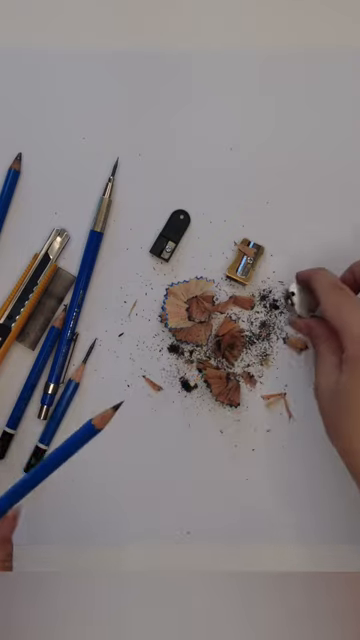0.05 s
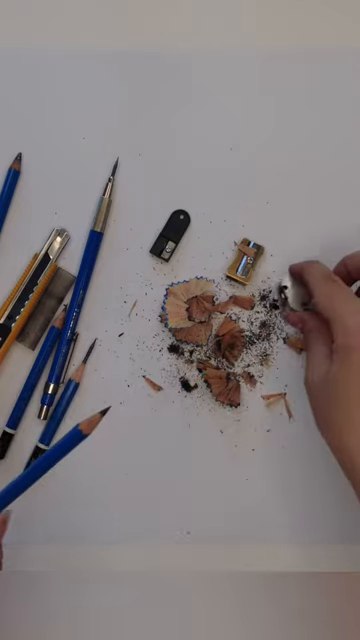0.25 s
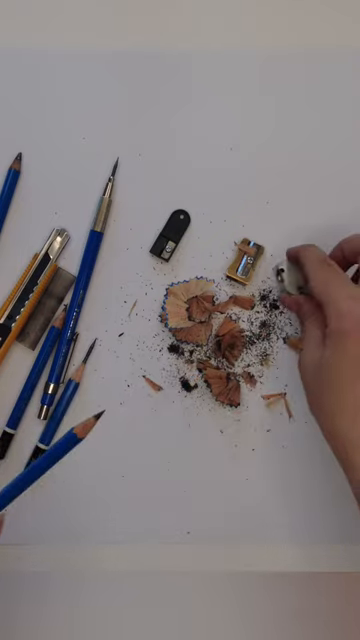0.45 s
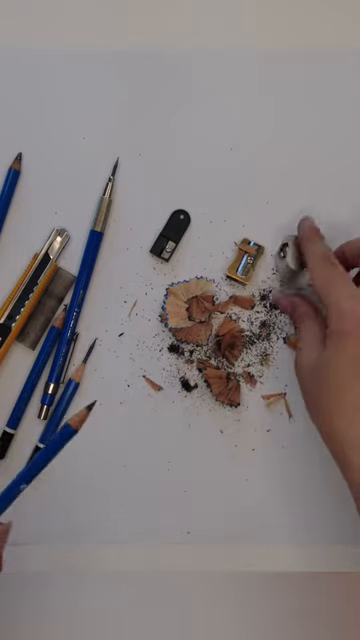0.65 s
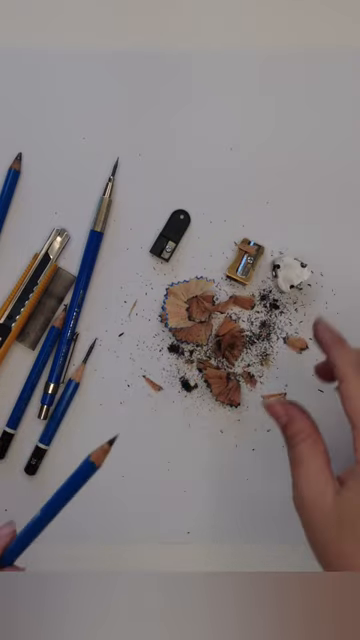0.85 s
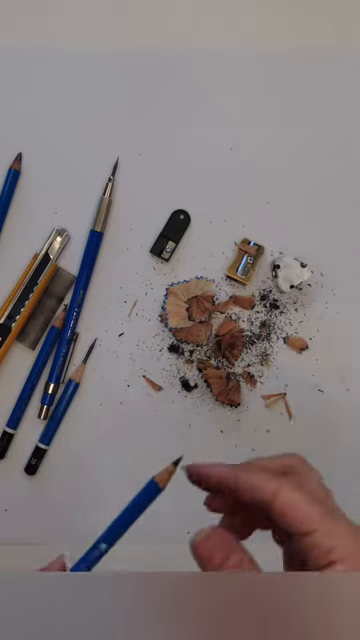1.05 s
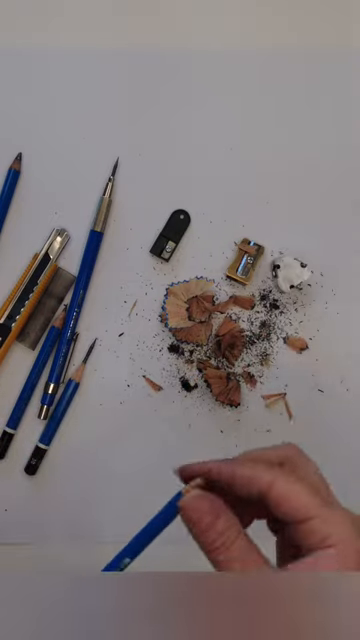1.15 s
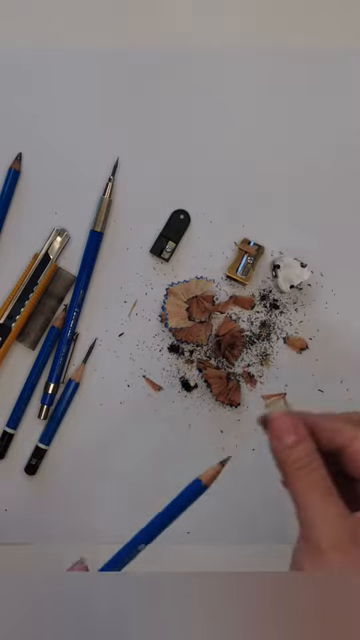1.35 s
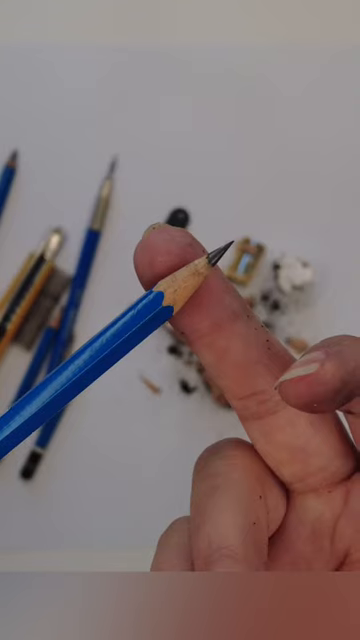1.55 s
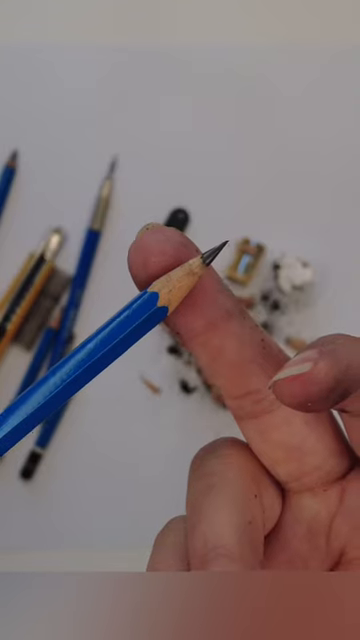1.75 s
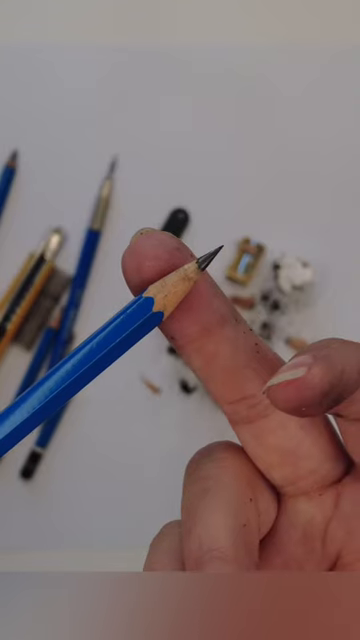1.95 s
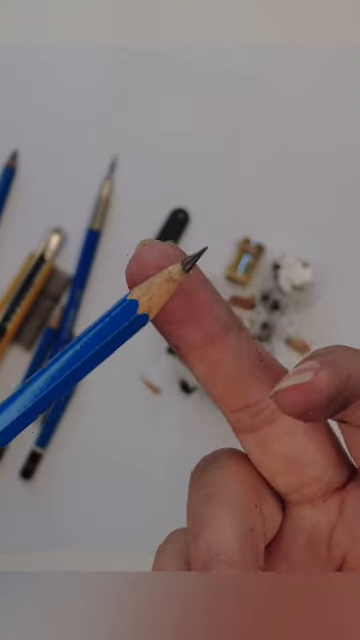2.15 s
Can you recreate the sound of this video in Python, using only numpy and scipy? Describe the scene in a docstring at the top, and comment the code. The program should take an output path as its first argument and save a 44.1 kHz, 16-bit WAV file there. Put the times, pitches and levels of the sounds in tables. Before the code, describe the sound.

An eraser is dabbed on paper four times between about 0.25 and 0.75 seconds, the third loudest, each a dull table thud with tiny clicks of paper and crumbs. It rocks lightly to rest. From about 1 second a hand slides faintly over the sheet and along a pencil, bumping the table softly at 1.5 seconds. Then only the small room's quiet hiss and rumble remain, slightly stronger.

```python
"""A small quiet room with paper on a table. A lump of eraser is dabbed four times on the sheet and
rocks to rest: each dab rings the table top with a dull thud while paper and crumbs click under it.
A hand then slides over the sheet and along a pencil, and bumps the table softly.
The sound breaks off for an instant and the room hiss returns a little stronger."""
import sys
import numpy as np
from scipy import signal
from scipy.fft import rfft, irfft, next_fast_len
from scipy.io import wavfile
from scipy.ndimage import map_coordinates

SR = 44100
rng = np.random.default_rng(int(sys.argv[2]) if len(sys.argv) > 2 else 0)


def unload_wav(signal):
    """Save mono or channel-first audio to the path in sys.argv[1] as 16-bit WAV at rate SR, clipped to [-1, 1]."""
    wavfile.write(
        sys.argv[1],
        SR,
        np.round(np.clip(np.atleast_2d(signal).T, -1, 1) * 32767).astype(np.int16),
    )


N = 97020
BREAK_S = 1.531

# Four eraser dabs, then a light contact as it rocks to rest:
# (time [s], push on the table [dB] in seven bands: thud, boom, body, hollow, knock, clack, rap)
DABS = [(0.2488, -2.5, 0, -4, 0.5, -5.5, -5.5, -2.5), (0.4382, -3, -2.5, 1.5, -3.5, -0.5, 1.5, -0.5),
        (0.556, 0, -0.5, 9.5, 4.5, 8, 8, 11.5), (0.7488, 0.5, -11, -2.5, -2.5, -6, -6, -8),
        (0.7891, -11, -22, -7.5, -4.5, -19.5, -10.5, -15)]
# Stereo image of room tone and handling: (frequency [Hz], left-right likeness [0-1])
IMAGE = [(40, 0.98), (200, 0.94), (500, 0.16), (1200, 0.12), (5000, 0.32), (12000, 0.059)]
# Stereo image of the reverb: (frequency [Hz], left-right likeness [0-1])
REVERB_IMAGE = [(100, 0.74), (300, 0.85), (600, 0.2), (1200, 0.24), (5000, 0.086), (14000, 0.18)]


def amp(db):
    """Decibels to gain."""
    return 10 ** (np.asarray(db) / 20)


def unit(x):
    """Scale to rms 1."""
    return x / np.sqrt(np.mean(x ** 2) + 1e-20)


def along(points, hz):
    """Read (frequency, value) points on a log axis."""
    freqs, values = np.transpose(points)
    return np.interp(np.log(hz + 1), np.log(freqs + 1), values)


def since(s):
    """Seconds since s, zero before."""
    return np.maximum(np.arange(N) / SR - s, 0)


def decay(t, t60, db=0):
    """An envelope that starts at db and falls 60 dB in t60 seconds."""
    return amp(db - 60 * t / t60)


def attack(t, rise_s):
    """A fade-in with time constant rise_s."""
    return 1 - np.exp(-t / rise_s)


def curves(rows):
    """One automation curve for each column after the time."""
    times, *columns = np.transpose(rows)
    return [np.interp(since(0), times, column) for column in columns]


def wobble(per_s):
    """A smooth random curve with per_s knots a second."""
    return map_coordinates(rng.standard_normal(4000), [since(0) * per_s], mode="mirror")


def filtered(x, response):
    """Shape x with a frequency response."""
    size = next_fast_len(N + SR // 2)
    return irfft(rfft(x, size) * response(np.fft.rfftfreq(size, 1 / SR)), size)[..., :N]


def noise(colour, image=IMAGE):
    """Stereo noise of rms 1; colour sets only the balance of its frequencies."""
    def response(hz):
        width = np.arccos(np.clip(along(image, hz), -1, 1)) / 2
        return amp(along(colour, hz)) * [np.cos(width), np.sin(width)]
    mid, side = filtered(rng.standard_normal((2, N)), response)
    return unit(np.array([mid + side, mid - side]))


def room_tone():
    """Low rumble, mains hum and quiet hiss; a broader hiss comes up early on, around 0.25 s."""
    # Noise colours: (frequency [Hz], level [dB])
    rumble = [(20, -7.5), (42, 4.5), (58, -4.5), (80, -7.5), (105, -11.5), (150, -21.5), (250, -23),
              (450, -43), (1000, -64.5)]
    quiet_hiss = [(100, 10), (400, 3), (700, 2.5), (1000, -3), (1400, 2), (2500, -9.5), (3900, -9),
                  (4900, -5), (8000, -11), (12500, -15.5), (13300, -40)]
    broad_hiss = [(100, 2.5), (400, 9.5), (700, 5), (1400, 3.5), (2500, -1), (3900, -4), (4900, -10),
                  (8000, -16), (12500, -21), (13300, -28)]
    # Fade-in of the broad hiss: (time [s], level [dB])
    broad_fade = [(0, -105), (.22, -100), (.3, -74.5), (.9, -74.5), (1.5, -75)]
    hum_hz = 100
    hum = amp(-61.5) * np.sin(2 * np.pi * hum_hz * since(0))
    hiss = amp(-75.5) * noise(quiet_hiss) + amp(curves(broad_fade)[0]) * noise(broad_hiss)
    return amp(-57) * noise(rumble) + hum + hiss


def late_room_tone():
    """The room after the break: a stronger hiss over a rumble that swells twice."""
    # Noise colours: (frequency [Hz], level [dB])
    rumble = [(20, -8.5), (42, 1), (55, -10.5), (72, 0), (85, -12.5), (102, 3.5), (130, -26.5), (210, -29),
              (280, -33), (450, -33), (1000, -74)]
    hiss = [(100, 2), (210, 7), (340, -0.5), (560, -2), (840, -0.5), (960, 3.5), (1070, -1), (1290, 5),
            (1650, 1), (2400, -5.5), (4000, -10.5), (6000, -13), (9000, -19.5), (12500, -25.5),
            (13300, -37)]
    swell = [(70, -23), (140, 9), (180, -5.5), (220, 2.5), (290, -8), (500, -34.5)]
    # The two low swells: (time [s], level [dB])
    swell_fade = [(1.53, -75), (1.68, -75.5), (1.75, -68.5), (1.82, -71), (2.05, -72), (2.19, -66)]
    hiss_db = -69.5 + 0.5 * since(BREAK_S)
    bed = amp(-57.5) * noise(rumble) + amp(hiss_db) * noise(hiss)
    return bed + amp(curves(swell_fade)[0]) * noise(swell)


def reverb(x):
    """A small room's tail; bass lingers longest."""
    # Reverb time: (frequency [Hz], t60 [s])
    ring_times = [(100, .4), (350, .3), (600, .22), (1000, .3), (1600, .32), (5000, .24)]
    # Reverb send: (frequency [Hz], level [dB])
    send = [(60, -1.5), (140, -4.5), (240, -10.5), (370, 2), (600, -6.5), (900, -2), (1600, -3),
            (5000, -1.5)]
    white = noise([(1000, 0)], REVERB_IMAGE)[:, :SR * 3 // 4]
    hz, t, bands = signal.stft(white, SR, nperseg=256)
    fade = decay(t, along(ring_times, hz)[:, None]) * attack(t, 0.0049)
    energy = np.sum(fade ** 2, axis=1, keepdims=True) * t[1] * SR
    fade *= amp(along(send, hz))[:, None] / np.sqrt(energy)
    tail = signal.istft(bands * fade, SR, nperseg=256)[1]
    return signal.fftconvolve(x[None], tail, axes=1)[:, :N]


def finger_stroke(colour, at_s, sigma_s, db):
    """A bell-shaped swell of skin rubbing on the pencil."""
    return amp(db) * np.exp(-.5 * ((since(0) - at_s) / sigma_s) ** 2) * noise(colour)


def hand_slide():
    """Skin on paper and pencil: grainy friction in three registers; fingers chafe, grip and slip off."""
    # The hand's travel: (time [s], rub [dB], rustle [dB], silk [dB])
    travel = [(.9, -91, -114, -104), (.95, -73.5, -85, -89), (1.02, -76, -74, -71.5),
              (1.08, -77.5, -72.5, -71), (1.16, -67.5, -70.5, -77), (1.195, -71, -68, -83),
              (1.255, -66, -69.5, -84), (1.30, -68.5, -69.5, -83), (1.36, -70.5, -70, -86),
              (1.43, -84, -75, -80), (1.47, -73, -73.5, -80), (1.53, -69.5, -75.5, -95)]
    # Low, middle and high friction colours: (frequency [Hz], level [dB])
    rub = [(100, 1.5), (250, 5), (330, 2.5), (440, 8), (600, -0.5), (780, 0), (1100, -13), (2500, -27)]
    rustle = [(400, -62), (900, 7.5), (1400, 4), (2200, 1), (3200, 0), (6000, -5), (8000, -8.5),
              (15000, -12)]
    silk = [(5000, -60), (8300, -19), (9300, -15), (11000, -12), (12700, 0.5), (14000, -3), (15800, -29)]
    # Colours of the fingers on the pencil: (frequency [Hz], level [dB])
    chafe = [(800, 3), (1100, -12), (1270, 19), (1420, -6), (1570, 16.5), (1900, -16), (2400, -2),
             (3000, -6), (4000, -34)]
    grip = [(2000, -3), (3100, 3.5), (4000, -18), (8000, -12), (9200, 4.5), (10500, -14), (12600, 0),
            (14000, -4), (16000, -7.5)]
    slip = [(2000, -17), (7000, -15), (9500, -7), (11000, 4), (12500, -12), (15800, -1)]
    friction = sum(amp(db) * noise(colour) for db, colour in zip(curves(travel), (rub, rustle, silk)))
    fingers = (finger_stroke(chafe, at_s=1.295, sigma_s=0.03, db=-66)
               + finger_stroke(grip, at_s=1.328, sigma_s=0.013, db=-65)
               + finger_stroke(slip, at_s=1.462, sigma_s=0.026, db=-73))
    grain = amp(0.5 * wobble(per_s=90))
    return (friction + fingers) * grain


def pencil_glide():
    """Friction in a narrow resonance that climbs as a finger runs up the pencil."""
    # The resonance: (time [s], frequency [Hz], level [dB])
    sweep = [(1.12, 418, -95), (1.17, 446, -83), (1.2, 466, -58), (1.222, 575, -87), (1.235, 733, -69.5),
             (1.258, 795, -72), (1.28, 1160, -81), (1.31, 1310, -95)]
    hz, db = curves(sweep)
    cycles = np.cumsum(hz) / SR
    width = 0.3  # bandwidth as a share of the pitch
    in_phase, quadrature = (map_coordinates(rng.standard_normal(N), [cycles * width], mode="mirror")
                            for _ in range(2))
    phase = 2 * np.pi * cycles
    return amp(db) * unit(in_phase * np.cos(phase) + quadrature * np.sin(phase))


def hand_bump():
    """The hand meets the table with a soft, dull scuff."""
    # Scuff colour: (frequency [Hz], level [dB])
    scuff = [(150, -28), (230, -16), (300, 1.5), (430, -4.5), (530, -6), (620, -3.5), (900, -5),
             (1100, -20), (3000, -49)]
    t = since(1.492)
    return decay(t, t60=0.68, db=-54) * attack(t, 0.0027) * noise(scuff)


def dab_lead_ins():
    """A faint noise swells just before each dab, louder before a firm one."""
    # Lead-in colour: (frequency [Hz], level [dB])
    colour = [(150, -10), (400, -4), (800, -4.5), (1500, -15), (5000, -33), (12000, -39)]
    t, lead_s = since(0), 0.017
    swell = sum(amp(-62 + clack_db / 2) * (t < s) * np.exp(-np.abs(t - s) / lead_s)
                for s, *_, clack_db, _rap_db in DABS)
    return swell * noise(colour)


def click_layer(times, levels_db, colour, t60, room_db):
    """One register of the clicks: short bursts, scatter off nearby things and a diffuse tail."""
    def echo_power(echo_t60, db):
        power = decay(since(0), echo_t60) ** 2
        return amp(db) ** 2 * power / np.sum(power)
    bursts = sum(attack(since(s), 0.00043) * decay(since(s), t60, db) for s, db in zip(times, levels_db))
    echoes = echo_power(0.097, db=-10) + echo_power(0.26, db=room_db)
    tail = np.sqrt(np.abs(signal.fftconvolve(bursts ** 2, echoes)[:N]))
    return bursts * noise(colour, image=[(1000, 0.76)]) + tail * noise(colour, REVERB_IMAGE)


def paper_clicks():
    """Paper and crumbs snap under the eraser for a few milliseconds; some ring with a bright tick."""
    # Click cues: (time [s], snap [dB], crisp top [dB], tick [dB])
    cues = [(0.2483, -43.5, -57, -71), (0.2524, -50, -60, -48.5), (0.286, -88, -60, -90),
            (.4380, -41.5, -62, -56), (0.4416, -48.5, -44.5, -52), (0.5552, -33.5, -64, -39.5),
            (0.561, -60, -74, -78), (0.5646, -40, -56, -69), (0.7467, -47, -54, -55),
            (0.7482, -46.5, -70, -58), (0.764, -47, -52.5, -66)]
    # Colours of the three registers: (frequency [Hz], level [dB])
    snap = [(300, 7), (1500, -4), (2400, -6), (3500, -2.5), (4400, -3), (5400, -3), (6100, -8),
            (7000, -13.5), (10000, -22.5), (16000, -34)]
    crisp = [(2000, -33), (8000, -10), (11500, -9), (13500, 7), (16000, 1)]
    tick = [(3500, -42), (4700, -15), (5100, 1), (5600, 2.5), (6100, -23), (7500, -27)]
    times, snap_db, crisp_db, tick_db = np.transpose(cues)
    return (click_layer(times, snap_db, snap, t60=0.0085, room_db=-2.5)
            + click_layer(times, crisp_db, crisp, t60=0.0057, room_db=-7)
            + click_layer(times, tick_db, tick, t60=0.0059, room_db=-16))


def eraser_dab(s, push_db):
    """A dab rings the table's modes and a dense, dry rattle; one wall and the room answer."""
    # Centres of the seven push bands: (frequency [Hz])
    band_hz = [140, 200, 340, 455, 600, 800, 1400]
    # Modes of the table top: (frequency [Hz], level before the push [dB], t60 [s])
    modes = [(149.8, -28.5, 0.075), (203.3, -26, 0.055), (264, -31, 0.048), (331.3, -37, 0.093),
             (359.4, -43, 0.076), (454.3, -43, 0.12), (552.8, -34.5, 0.066), (591.8, -36, 0.069),
             (670, -57, 0.037), (794.6, -46.5, 0.082), (929, -54.5, 0.068), (1102, -63, 0.08),
             (1339, -53.5, 0.041)]
    # Colour of the table's dense ring: (frequency [Hz], level [dB])
    dense_ring = [(120, -18), (300, -2), (750, 2), (1050, -6), (1400, -3.5), (1900, -11.5), (2600, -30),
                  (5000, -51)]
    t = since(s)
    wall_s, wall_db, wall_cutoff_hz = 0.045, -15.5, 700

    def push(hz):
        return np.interp(np.log(hz + 1), np.log(band_hz), push_db)

    def mode(hz, db, t60):
        wander_rad = 0.65 * attack(t, 0.05) * wobble(per_s=45)
        return decay(t, t60, db) * np.sin(2 * np.pi * hz * t + wander_rad)

    def dull_echo(hz):
        return amp(wall_db) * np.exp(-2j * np.pi * hz * wall_s) / (1 + 1j * hz / wall_cutoff_hz)

    ring = sum(mode(hz, db + push(hz), t60) for hz, db, t60 in modes)
    rattle = filtered(noise(dense_ring)[0], lambda hz: amp(push(hz))) * decay(t, t60=0.06, db=-46.5)
    low_cut = signal.butter(3, 108, "high", fs=SR, output="sos")  # a steep cut below about 100 Hz keeps the thud free of deep bass
    thud = signal.sosfilt(low_cut, (rattle - ring) * attack(t, 0.0027))
    reflections = filtered(thud, dull_echo) + reverb(thud)
    sway = mode(hz=41.4, db=-50 + push_db[0], t60=0.9)  # the whole table rocks on its legs
    boom = mode(hz=196, db=-45 + push(196), t60=0.48)  # hangs on under the table
    return thud + reflections + sway - boom


def scene():
    """Eraser and hand over room tone up to the break, then the room alone."""
    thuds = sum(eraser_dab(s, push_db) for s, *push_db in DABS)
    dabs = thuds + dab_lead_ins() + paper_clicks()
    hand = hand_slide() + pencil_glide() + hand_bump()
    t = since(BREAK_S)
    return (dabs + hand + room_tone()) * (t == 0) + late_room_tone() * attack(t, 0.013)


def record(dry):
    """A brick-wall low-pass takes off the very top."""
    return filtered(dry, lambda hz: hz < 15850)


dry = scene()
out = record(dry)
unload_wav(out)
```